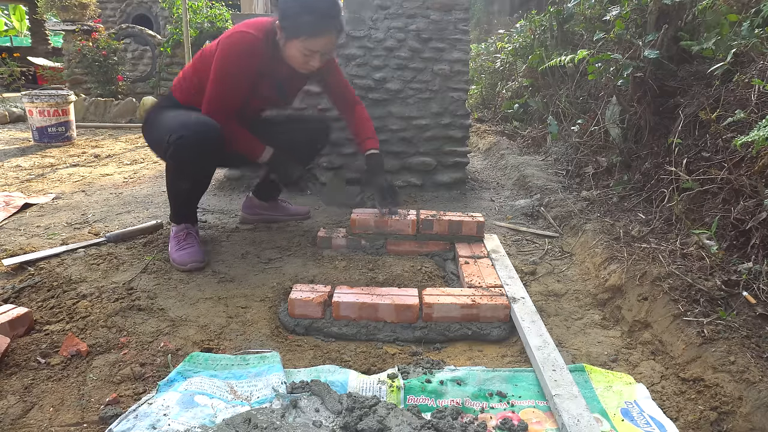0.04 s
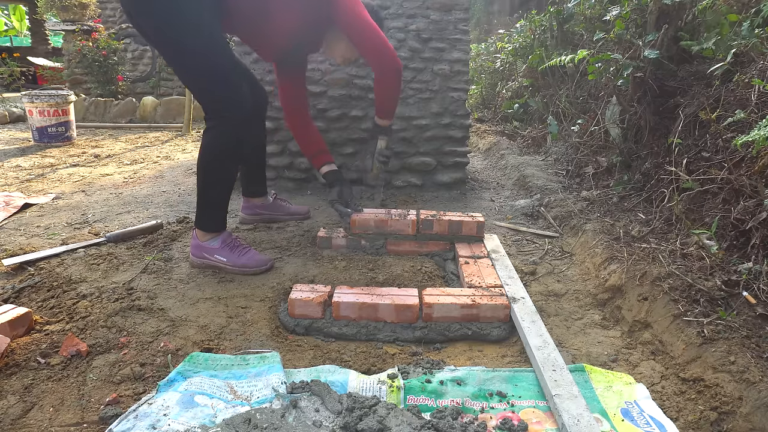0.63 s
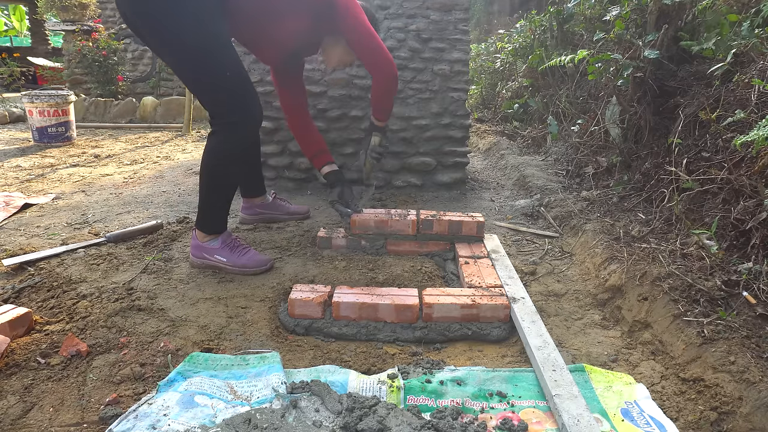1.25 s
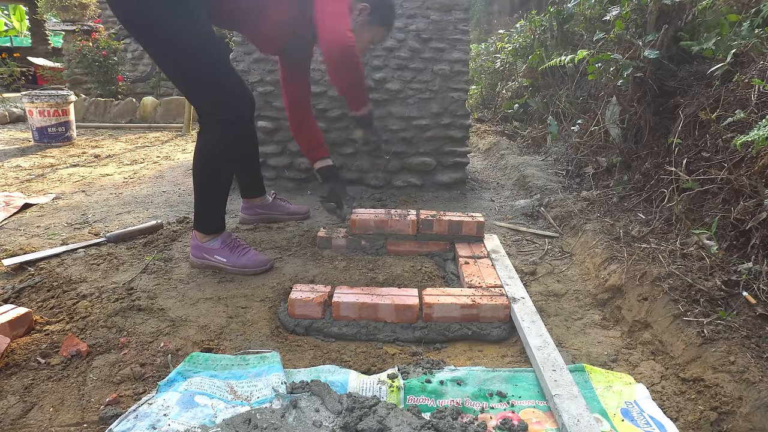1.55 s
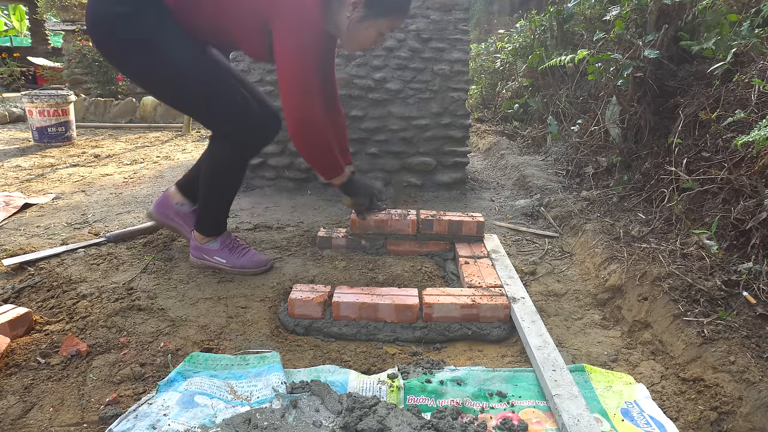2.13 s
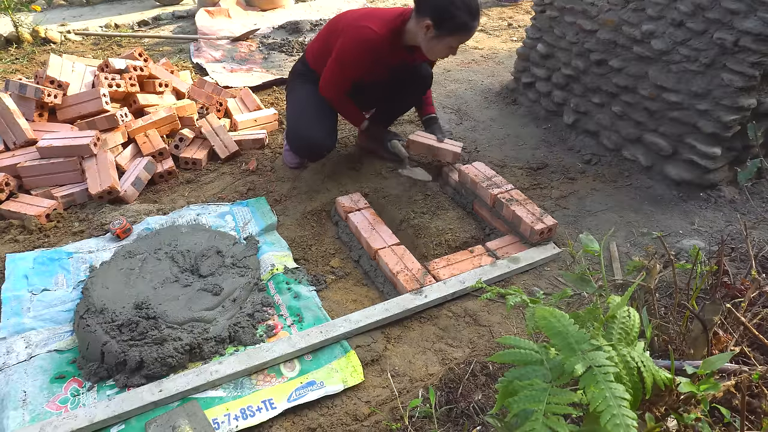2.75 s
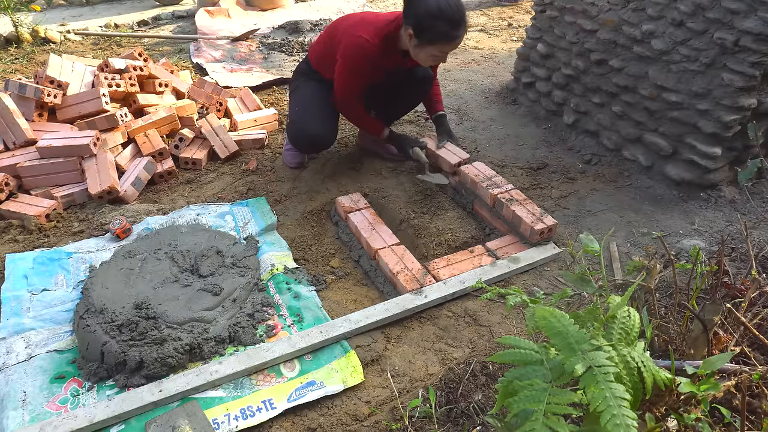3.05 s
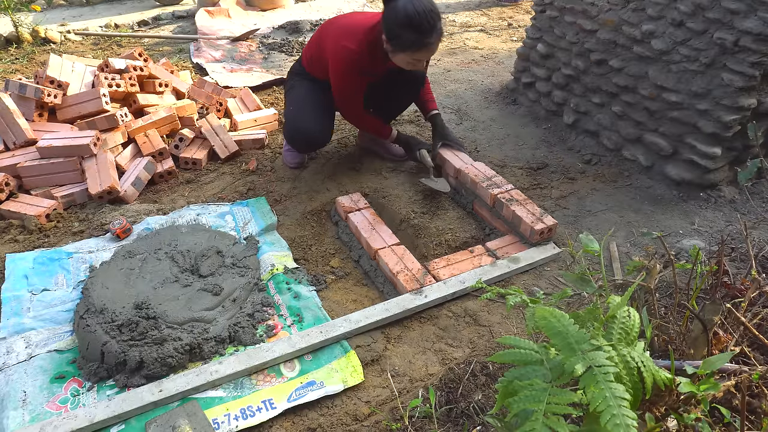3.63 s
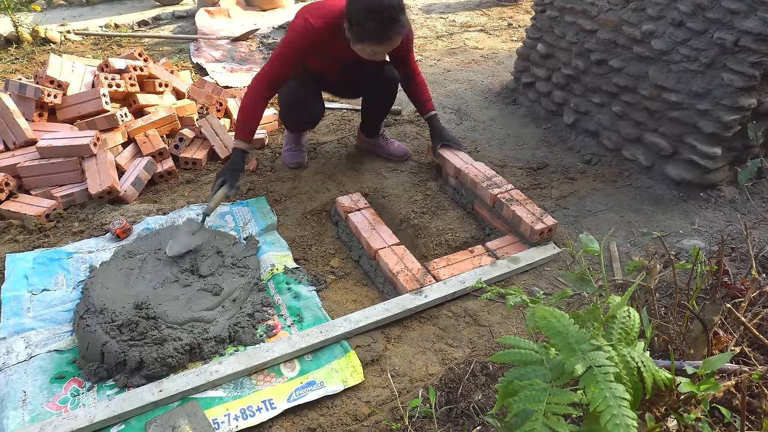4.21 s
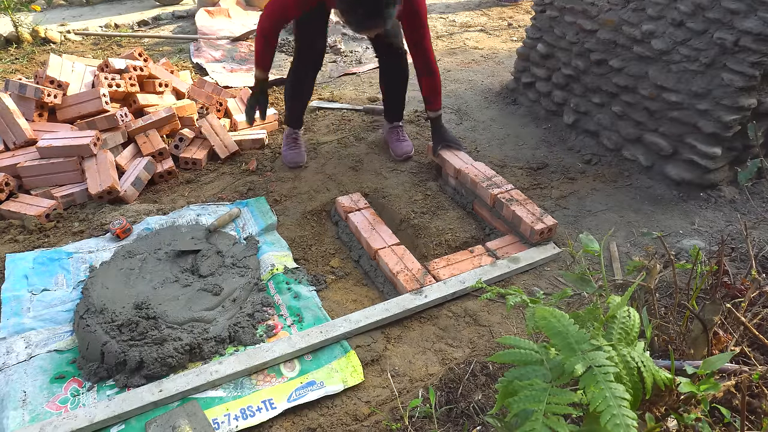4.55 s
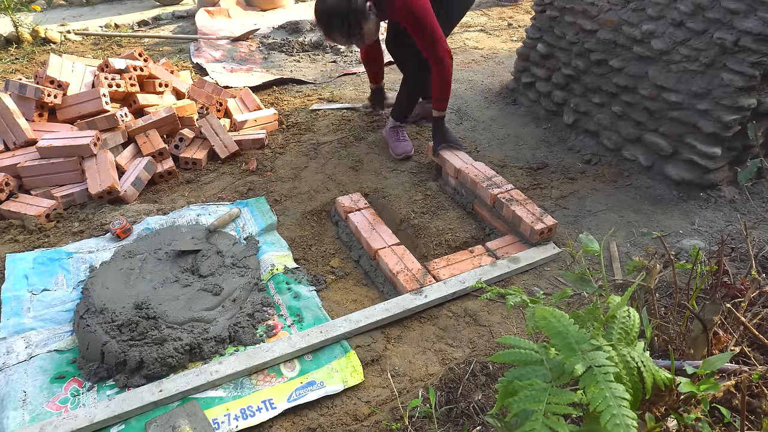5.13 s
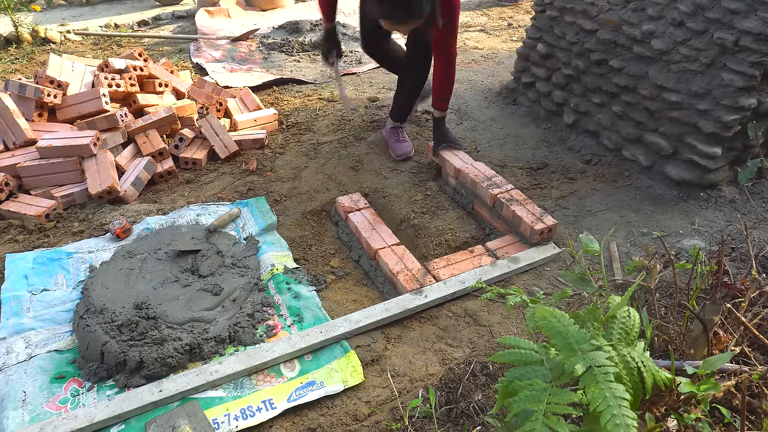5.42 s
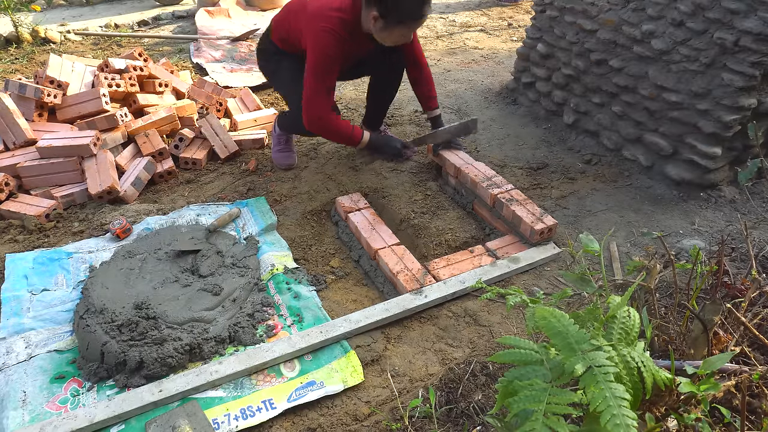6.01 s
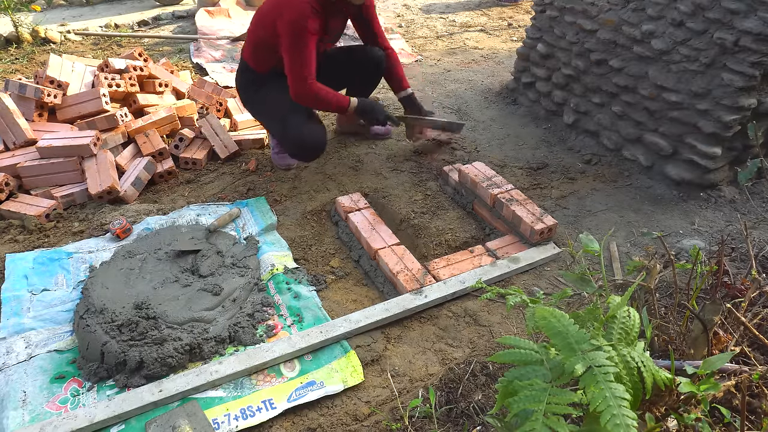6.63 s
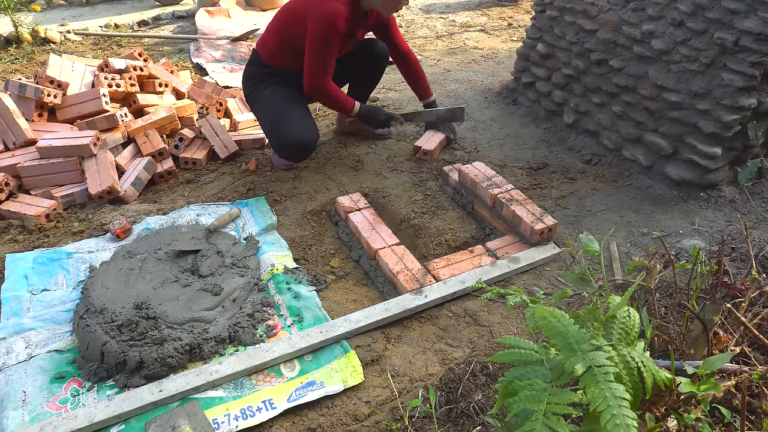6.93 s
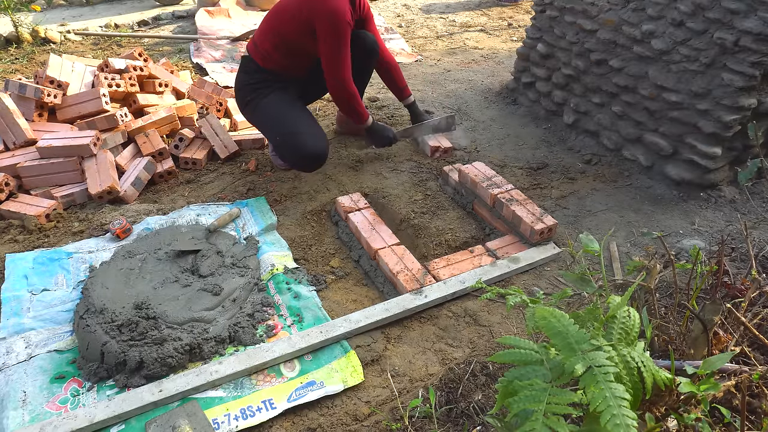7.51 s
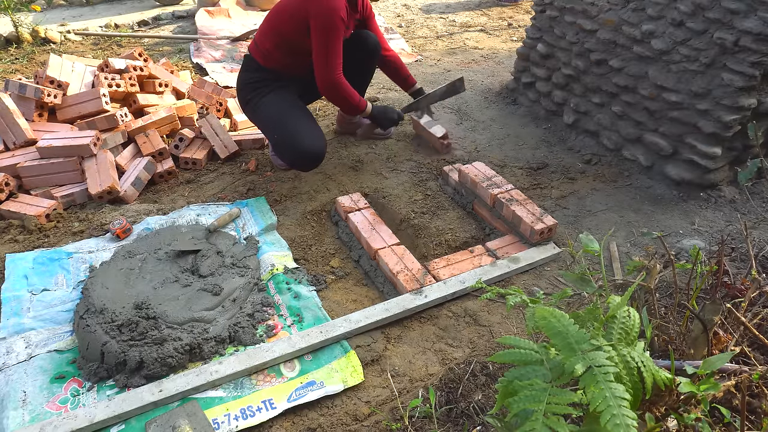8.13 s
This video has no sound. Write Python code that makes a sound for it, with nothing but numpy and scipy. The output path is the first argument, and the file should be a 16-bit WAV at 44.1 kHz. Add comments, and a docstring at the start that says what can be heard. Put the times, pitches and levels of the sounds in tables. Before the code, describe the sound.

A bricklayer works nearby in the open air, with a far engine, insect hiss and a few bird calls faint behind. First comes a quick run of damped knocks on a brick, then gritty trowel scraping with a slight metallic singing, and a crunchy stab into the mortar heap. Shoes scuff on sandy earth. Finally a steel blade strikes a brick six times, cracking and ringing brightly.

```python
"""A far engine drones, insects hiss and birds call faintly while a bricklayer works on bare earth.
Shoes scuff, then six taps bed a brick, each impact damped by the mortar; a seventh follows at 2.2 s.
The trowel scrapes wet grit, friction making its blade sing, and is stuck into the heap at 4.4 s.
From 6.2 s a steel blade chops six times at a hand-held brick and rings in its free modes,
while the engine speeds up."""
import sys
import numpy as np
from scipy import signal
from scipy.fft import rfft, irfft, next_fast_len
from scipy.io import wavfile
from scipy.ndimage import uniform_filter1d

SR = 44100
rng = np.random.default_rng(int(sys.argv[2]) if len(sys.argv) > 2 else 0)


def store_wav(level_fs):
    """Save 16-bit WAV to argv[1]."""
    pcm = np.round(np.clip(np.atleast_2d(level_fs), -1, 1) * 32767)
    wavfile.write(sys.argv[1], SR, pcm.T.astype(np.int16))


N = 369116
TIME = np.arange(N) / SR
T = np.arange(SR * 3 // 5) / SR  # time within one short event


def undb(db):
    """Amplitude ratio from decibels."""
    return 10 ** (np.asarray(db) / 20)

def level(x, db):
    """Scaling to an rms level."""
    return x * undb(db) / np.sqrt(np.mean(x ** 2))

def blow(x, db):
    """Exposure level: the energy of 10 ms of sound at this rms level."""
    return level(x, db) * np.sqrt(SR / 100 / x.shape[-1])

def fade(t60):
    """Exponential decay, 60 dB in t60 seconds."""
    return np.exp(-np.log(1000) * T / t60)

def colour(x, points):
    """Minimum-phase filter through (f/Hz, gain/dB) points, by folding the cepstrum."""
    size = 2 * next_fast_len(x.shape[-1])
    hz, db = np.transpose(points)
    bins_hz = np.arange(size // 2 + 1) * SR / size
    gain_db = np.interp(np.log(bins_hz + 1), np.log(hz), db)
    cepstrum = irfft(np.log(undb(gain_db)))[:size // 2]
    cepstrum[1:] *= 2
    return irfft(rfft(x, size) * np.exp(rfft(cepstrum, size)), size)[..., :x.shape[-1]]

def band(x, hz, width_hz):
    """Second-order resonance."""
    return signal.lfilter(*signal.iirpeak(hz, hz / width_hz, fs=SR), x)

def narrow(x, hz, width_hz):
    """Two equal resonances in cascade."""
    return band(band(x, hz, width_hz), hz, width_hz)

def ring(modes, scatter, pitch=1):
    """Modal superposition: damped sinusoids, a little different at each blow."""
    return sum(undb(db + rng.normal()) * fade(t60) * rng.choice([-1, 1])
               * np.sin(2 * np.pi * hz * pitch * (1 + scatter * rng.normal()) * T)
               for hz, db, t60 in modes)

def widen(pair, side_db):
    """Mid-side stereo from two uncorrelated signals."""
    return pair[0] + undb(side_db) * pair[1] * np.array([[1], [-1]])

def burst(points, t60, side_db=-12):
    """Densely overlapping modes act as decaying noise with a sharp front."""
    noise = widen(rng.standard_normal((2, len(T))), side_db)
    return colour(noise * (fade(t60) + 0.57 * fade(0.0066)), points)

def grains(size, per_s, spread_db):
    """Shot noise: sand grains click at random with unequal strength."""
    shape = (2, size)
    strength = undb(spread_db * np.minimum(rng.exponential(size=shape), 4))
    hits = rng.random(shape) < per_s / SR
    return widen(hits * strength * rng.choice([-1, 1], shape), side_db=-9)

def drift(per_s):
    """Smooth random modulation with a spread near 1."""
    step = int(SR / per_s)
    return uniform_filter1d(np.repeat(rng.standard_normal(N // step + 1), step), step)[:N]

def add(out, s, x, pan_db=0):
    """Amplitude panning: x enters at time s; pan is left minus right level."""
    start = int(s * SR)
    x = x[..., max(-start, 0):N - start]
    start = max(start, 0)
    out[:, start:start + x.shape[-1]] += x * undb(np.array([[pan_db], [-pan_db]]) / 2)


# spectrum of open air: f/Hz, gain/dB
AIR_SPECTRUM = [(15, -37), (25, -22), (53, -15.5), (92, -4), (317, -16), (575, -19.5), (695, -12),
                (840, -17.5), (2760, -20.5), (2990, -18.5), (4490, -22.5), (6380, -21.5), (6920, -26),
                (11000, -22.5), (16000, -29)]

def air():
    """Distant rumble and leaf hiss: partly coherent noise, wider in the treble."""
    mid, side = (colour(rng.standard_normal(N), AIR_SPECTRUM) for _ in range(2))
    mid = mid - 0.86 * band(mid, 92, 22)  # the rumble is thin around the engine note
    side = colour(side, [(100, -18), (700, -1), (3000, -2), (10000, -2)])
    return level(widen((mid, side), side_db=0), -56.5) * undb(2 * drift(4))

def insects():
    """A chorus merges into narrow-band noise, which swells after 2.1 s."""
    chorus = level(narrow(rng.standard_normal((2, N)), 6540, 350), -71)
    return chorus * undb(2 * drift(9)) * np.interp(TIME, [2.1, 2.4], [0.3, 1])

# swell of the far engine: t/s, relative level/dB
ENGINE_SWELL = [(0.0, -63), (0.16, -70.5), (2.14, -56), (2.56, -68.5), (3.38, -65.5), (3.96, -83),
                (5.52, -66), (5.97, -58.5), (6.5, -69.5), (6.57, -61), (8.37, -68)]
IDLE_HZ, WORK_HZ, REV_SPAN_S = 83.5, 104, (6.7, 7.7)

def engine():
    """Periodic firing gives a wavering fundamental and weak octave over a mechanical rush."""
    hz = np.interp(TIME, REV_SPAN_S, [IDLE_HZ, WORK_HZ]) * (1 + 0.0254 * drift(25))
    phase = 2 * np.pi * np.cumsum(hz) / SR
    note = level(np.sin(phase) + undb(-12.5) * np.sin(2 * phase), 0) * undb(1.7 * drift(22))
    rush = level(band(rng.standard_normal(N), 790, 600), -10.5)
    return (note + rush) * undb(np.interp(TIME, *np.transpose(ENGINE_SWELL)) - 0.5)

# spectra of grit under steel, fine sand and coarse lumps: f/Hz, gain/dB
GRIT_SPECTRUM = [(500, -33), (1800, -15.5), (2600, -6.5), (3400, 2), (4400, -1), (6500, -4.5), (9000, -9.5),
                 (16000, -24)]
FINE_SPECTRUM = [(1000, -39), (4000, -3.5), (7500, -3), (10000, -1.5), (14000, 1), (16000, -4)]
LUMP_SPECTRUM = [(80, -26), (170, -2.5), (350, -2.5), (600, -5), (1100, -2), (1700, -7.5), (3000, 0.5),
                 (5000, -12), (14000, -17.5)]
# where the hand works: t/s, pan/dB
HAND_PATH = [(1.8, 0), (2.3, -1.3), (3.5, -2.5), (4.1, 3.5), (4.45, 2.5), (5, 1), (6.7, -2), (8.3, -2)]

def rubbed_sand(pushes):
    """Granular friction: shot noise of grit, fine sand and lumps swells and dies with each push."""
    grit = colour(grains(N, per_s=3000, spread_db=2.5), GRIT_SPECTRUM)
    # the trowel's damped modes come and go as its pressure shifts
    grit = grit + sum(band(grit, hz, 140) * undb(5.5 * drift(14)) for hz in (2800, 3480, 4430))
    grit = level(grit, -2.2) * undb(2 * drift(90))
    fine = level(colour(grains(N, per_s=13000, spread_db=4), FINE_SPECTRUM), -1)
    lumps = level(colour(grains(N, per_s=5500, spread_db=2), LUMP_SPECTRUM), -0.36)
    envelopes = np.zeros((3, 2, N))
    for s, rise, fall, *levels_db in pushes:
        before_peak = np.maximum(2 * rise - T, 0) / rise
        after_peak = np.maximum(T - 2 * rise, 0) / fall
        swell = np.exp(-2 * before_peak ** 1.49 - 2 * after_peak ** 1.21)
        pan_db = np.interp(s, *np.transpose(HAND_PATH))
        for envelope, db in zip(envelopes, levels_db):
            add(envelope, s - 2 * rise, swell * undb(db), pan_db)
    return np.sum(envelopes * [grit, fine, lumps], axis=0) * undb(2.3 * drift(140))

# trowel strokes in wet sand, and at 8.254 s the blade rubbing on the brick: peak t/s, rise/s, fall/s, grit/dB,
# fine sand/dB, lumps/dB
TROWEL_STROKES = [(.04, 0.096, 0.043, -49, -49.5, -52), (1.54, 0.012, .056, -48.5, -43.5, -66),
                  (2.33, 0.072, 0.065, -52, -49.5, -56.5), (2.48, 0.059, 0.011, -45, -44, -60),
                  (2.65, 0.15, 0.2, -44, -43.5, -61), (2.703, 0.038, 0.019, -37.5, -36, -70),
                  (3.08, 0.086, 0.15, -44, -42, -58.5), (3.43, 0.23, 0.14, -55, -53, -53),
                  (3.565, 0.023, 0.011, -46, -45, -53), (4.09, 0.17, 0.21, -59, -50, -72),
                  (4.342, 0.018, 0.047, -47.5, -44, -71), (8.254, 0.0053, 0.058, -41, -39, -40.5)]
# the edge catches on a pebble: t/s, grit/dB, fine sand/dB
PEBBLE_CATCHES = [(.528, -44, -58), (1.656, -47, -45), (1.713, -44, -46.5), (2.513, -45, -50),
                  (2.542, -34, -40), (2.76, -43, -53), (2.826, -41, -46), (3.086, -48, -53),
                  (3.41, -45, -62), (3.577, -38.5, -63), (4.396, -42, -36.5), (4.601, -55, -47),
                  (4.7, -56, -41.5), (6.727, -39.5, -50)]

def trowel_pushes(slip_rise_s=0.0013, slip_fall_s=0.013):
    """Stick-slip: smooth strokes are broken by abrupt pushes as the edge slips free."""
    return TROWEL_STROKES + [(s, slip_rise_s, slip_fall_s, grit_db, fine_db, -np.inf)
                             for s, grit_db, fine_db in PEBBLE_CATCHES]

# far bird calls: t/s, f/Hz, level/dB
BIRD_CALLS = [(.18, 764, -58), (2.56, 650, -61.5), (2.84, 630, -61.5), (3.208, 720, -53), (3.769, 733, -59),
              (5.09, 720, -60.5)]

def birds():
    """Calls smeared by distance: narrow-band noise under Gaussian envelopes."""
    return sum(level(narrow(rng.standard_normal(N), hz, 130), db) * np.exp(-((TIME - s) / 0.021) ** 2)
               for s, hz, db in BIRD_CALLS)

# a shoe shifts on sandy earth: peak t/s, length/s, mean of grit and fine sand/dB, lumps/dB
SHOE_SCUFFS = [(0.47, 0.23, -50.5, -58), (.622, 0.024, -41.5, -66), (5.311, 0.23, -55, -73),
               (5.503, 0.17, -57, -71), (5.724, 0.091, -47.5, -76), (5.863, 0.15, -52.5, -57.5),
               (6.668, 0.13, -57, -50.5), (6.77, 0.13, -44.5, -61), (6.967, .08, -54.5, -62)]

def shoe_pushes(rise_share=0.65, tilt_db=1.5):
    """Sliding friction under a sole builds slowly and favours the fine sand."""
    return [(s, length * rise_share, length * (1 - rise_share), db - tilt_db, db + tilt_db, lumps_db)
            for s, length, db, lumps_db in SHOE_SCUFFS]

# footfalls and bricks set down: t/s, level/dB, T60/s, upper edge f/Hz
EARTH_THUDS = [(.464, -38.5, 0.038, 950), (2.182, -46.5, 0.081, 800), (3.31, -42, 0.059, 1430),
               (4.995, -48.5, 0.18, 2600), (6.736, -48.5, 0.047, 200), (6.771, -33, 0.09, 202)]

def thuds():
    """Soft impacts on earth: a long contact excites mainly low frequencies."""
    out = np.zeros((2, N))
    for s, db, t60, edge_hz in EARTH_THUDS:
        spectrum = [(60, -22), (150, 0), (edge_hz, -2), (1.25 * edge_hz, -18), (12000, -45)]
        add(out, s, blow(burst(spectrum, t60, side_db=-37), db))
    return out

def crumbs():
    """Tiny impacts radiate treble: bits of dry mortar tick on the ground at random."""
    out = np.zeros((2, N))
    for when, size, side in rng.random((24, 3)):
        tick = blow(burst(FINE_SPECTRUM, t60=0.011), -62 + 9 * size)
        add(out, when * N / SR, tick, pan_db=6 * (side - 0.5))
    return out

# taps that bed a brick: t/s, thud/dB, clack/dB, clack T60/s, tick/dB, tick upper edge f/Hz
BRICK_TAPS = [(.7042, -24.5, -35, 0.027, -30.5, 17000), (0.84, -27, -27, 0.092, -27, 11600),
              (0.9684, -22.5, -23, 0.062, -33.5, 12000), (1.1025, -25.5, -28, 0.026, -27.5, 12900),
              (1.227, -23.5, -29, 0.057, -27, 12800), (1.3766, -22.5, -29.5, 0.065, -33.5, 11800),
              (2.2106, -38.5, -30, 0.048, -23.5, 8600)]
# modes of the brick in its mortar: f/Hz, level/dB, T60/s
BED_MODES = [(199, -21, 0.13), (288.8, -18, 0.1), (578, -5, 0.062), (674, -1.5, 0.024), (933, 2.5, 0.022),
             (965, -3.5, 0.043), (1149, -12, 0.068), (1430, -8, 0.018)]
# spectra of hard contact on fired clay and of its sharp tick: f/Hz, gain/dB
CLACK_SPECTRUM = [(120, -51), (400, -18.5), (750, -4.5), (1200, -2.5), (1800, -6), (2500, 0.5), (3200, 4.5),
                  (4200, -9.5), (5200, -10), (7000, -13), (9000, -22.5), (16000, -19.5)]
TICK_SPECTRUM = [(1000, -17), (3500, 2), (6200, -7), (8000, 0), (8900, 6.5), (9700, -8), (12000, -3),
                 (14200, 6.5), (16000, 5)]

def taps():
    """Damped impact: each tap ticks, clacks on the clay and thuds into the lossy mortar."""
    out = np.zeros((2, N))
    for s, thud_db, clack_db, clack_t60, tick_db, edge_hz in BRICK_TAPS:
        thud = colour(ring(BED_MODES, scatter=0.011), [(150, -5), (400, -7), (620, -1)])
        clack = blow(burst(CLACK_SPECTRUM, clack_t60), clack_db)
        tail = blow(burst(CLACK_SPECTRUM, t60=0.39), clack_db - 19)
        # a blunter contact loses the top of its tick
        tick = signal.lfilter(*signal.butter(3, edge_hz, fs=SR), burst(TICK_SPECTRUM, t60=0.025))
        add(out, s, blow(thud, thud_db) + clack + tail + blow(tick, tick_db), pan_db=-0.3)
    return out

def mortar_pushes(delay_s=0.037, rise_s=0.008, fall_s=0.021):
    """Plastic flow: just after each tap, mortar squeezes from the joint."""
    return [(s + delay_s, rise_s, fall_s, tick_db - 40, tick_db - 28, tick_db - 30.5)
            for s, *_, tick_db, edge_hz in BRICK_TAPS]

# the dragged blade sings: t/s, half length/s, level/dB
BLADE_SINGS = [(3.418, .055, -52), (3.623, 0.058, -64), (4.235, 0.083, -62), (6.375, 0.024, -48.5),
               (7.41, .06, -61.5)]

def singing():
    """Forced vibration: dragging grit excites two modes of the blade."""
    rub = rng.standard_normal(N)
    lower = level(band(band(rub, 4810, 83), 4814, 83), 0)
    upper = level(narrow(rub, 5330, 120), -5.5)
    swells = sum(undb(db) * np.exp(-((TIME - s) / half) ** 2) for s, half, db in BLADE_SINGS)
    return (lower + upper) * undb(5 * drift(27.96)) * swells

STAB_S = 4.417
# the trowel enters the heap: delay/s, rise/s, fall/s, grit/dB, fine sand/dB, lumps/dB
STAB_STAGES = [(0, 0.00092, 0.013, -32, -28.5, -28), (.009, 0.0048, 0.038, -48, -32, -34.5),
               (.073, 0.028, 0.027, -44.5, -46, -48.5), (.11, 0.083, 0.24, -66, -48.5, -58)]

def stab_pushes():
    """Granular drag: the trowel hits, sinks in and tips over, then sand trickles."""
    return [(STAB_S + delay, *push) for delay, *push in STAB_STAGES]

# modes of the trowel in the heap: f/Hz, level/dB, T60/s
HEAP_MODES = [(189, -6.5, 0.082), (391, -4, 0.12), (780, -2, 0.086), (1155, -1, 0.093)]

def heap_knock():
    """Impulse response: low, damped modes give a hollow knock as the trowel enters."""
    out = np.zeros((2, N))
    add(out, STAB_S, blow(ring(HEAP_MODES, scatter=0.01), -34), pan_db=-1)
    return out

# blade on a held brick: t/s, crack/dB, tick/dB, clank/dB, clank pitch ratio, brick/dB,
# bend/dB, twist/dB, edge/dB, level of the blade's flutter and sand sizzle/dB, pan/dB
BLADE_CHOPS = [(6.2284, -24.5, -34.5, -25.5, 0.99, -42, -30.5, -36, -34, -48, -2.5),
               (6.839, -40, -36, -45, 0.9, -37, -62, -40.5, -30.5, -71, -1),
               (7.174, -30, -38, -21.5, 1, -45, -58, -70, -32.5, -59, -2),
               (7.5445, -25.5, -27, -29, 0.99, -56, -51, -54, -46, -36.5, 0),
               (7.9373, -29, -26.5, -30, 1, -56, -63, -63, -40, -36, -0.5),
               (8.318, -30, -19.5, -33, 0.96, -41, -38.5, -35.5, -30.5, -53, -2)]
# modes of blade and brick in contact, of the brick, and of the free blade: f/Hz, level/dB, T60/s
CLANK_MODES = [(1006, -11, 0.08), (1105, -4, 0.03), (1510, -10, 0.017), (1726, -6.5, 0.041),
               (2860, -20, 0.064), (3257, 2.5, 0.024), (3226, -3, 0.04), (4360, -12, 0.047),
               (4780, 2.5, 0.04), (5340, -1.5, 0.033)]
BRICK_MODES = [(2750, -2, 0.058), (3690, -7, 0.055), (8620, -1.5, 0.038)]
BEND_MODES = [(990, -46, .22), (3250, -9, 0.44), (4783, 3, 0.23), (5400, 11, 0.075), (5600, 6, 0.034)]
TWIST_MODES = [(7450, 0, 0.57)]
EDGE_MODES = [(9300, -2, 0.085), (11260, 1.5, 0.19), (13800, -15, 0.063), (15663, -10, .07)]
# spectrum of sand shaken by the blade: f/Hz, gain/dB
SIZZLE_SPECTRUM = [(200, -9), (700, -7), (1300, -5), (2200, 0.5), (3200, 4), (4000, -1), (5300, -1),
                   (6500, -5.5), (9500, -7), (13500, -4), (16000, -14)]
FLUTTER_HZ = 172

def chops():
    """Free vibration after impact: the blade cracks on the brick, rings and flutters on loose sand."""
    out = np.zeros((2, N))
    tick_spectrum = [(1000, -19), (5000, -12), (7500, -8), (10500, -4), (13600, 0), (16000, -2.5)]
    blade_modes = [BEND_MODES, TWIST_MODES, EDGE_MODES]
    swing = np.sin(2 * np.pi * FLUTTER_HZ * T)
    for s, crack_db, tick_db, clank_db, pitch, brick_db, *blade_db, flutter_db, pan_db in BLADE_CHOPS:
        tick = blow(burst(tick_spectrum, t60=0.053), tick_db)
        crack = blow(burst(CLACK_SPECTRUM, t60=0.027), crack_db)
        clank = blow(ring(CLANK_MODES, scatter=0.0034, pitch=pitch), clank_db)
        brick = blow(ring(BRICK_MODES, scatter=0.0047), brick_db)
        steel = sum(blow(ring(modes, scatter=0), db) for modes, db in zip(blade_modes, blade_db))
        flutter = blow(swing * fade(0.31), flutter_db - 2)
        # every swing shakes the sand, and the sand rings the blade again
        sand = colour(grains(len(T), per_s=12000, spread_db=-3) * (1 + 0.093 * swing), SIZZLE_SPECTRUM)
        sand = sand + 1.6 * sum(band(sand, hz, hz / 90) for modes in blade_modes for hz, *_ in modes)
        sizzle = level(sand, flutter_db + 3) * fade(0.88) * (1 - 0.48 * fade(0.072))
        add(out, s, tick + crack + clank + brick + steel + flutter + sizzle, pan_db)
    return out

def yard(x):
    """Radiation and scattering: small objects give no deep bass; walls and bushes return a faint tail."""
    x = signal.sosfilt(signal.butter(3, 105, "highpass", fs=SR, output="sos"), x)
    echoes = rng.standard_normal((2, len(T))) * fade(0.35) * (1 - fade(0.038))
    tail = colour(echoes, [(200, -9), (3200, -4), (6000, 2), (12000, -10.5)])
    return x + undb(-22.5) * signal.fftconvolve(x, tail / np.linalg.norm(tail[0]), axes=1)[:, :N]

def scene():
    """Superposition of the work in the yard and the distant background."""
    pushes = trowel_pushes() + shoe_pushes() + mortar_pushes() + stab_pushes()
    work = taps() + chops() + rubbed_sand(pushes) + thuds() + heap_knock() + crumbs() + singing()
    return yard(work) + engine() + birds() + air() + insects()

def record(dry):
    """Time of arrival: sound reaches the left port a moment late; the top is cut steeply."""
    lag_s, top_hz = 6e-6, 16000
    hz = np.arange(N // 2 + 1) * SR / N
    left = irfft(rfft(dry[0]) * np.exp(-2j * np.pi * hz * lag_s), N)
    return signal.sosfilt(signal.ellip(10, 0.2, 70, top_hz, fs=SR, output="sos"), [left, dry[1]])


dry = scene()
out = record(dry)
store_wav(out)
```